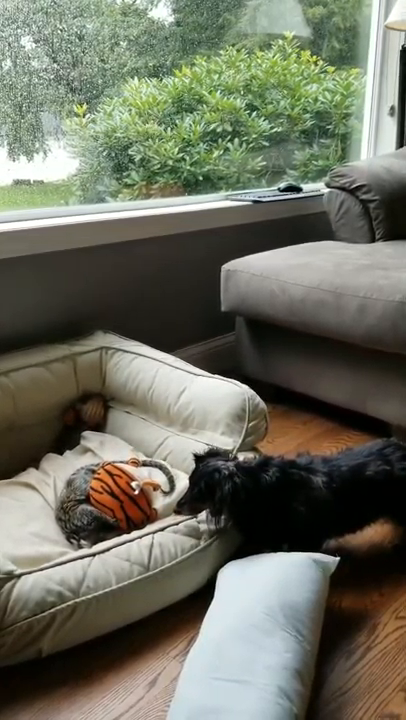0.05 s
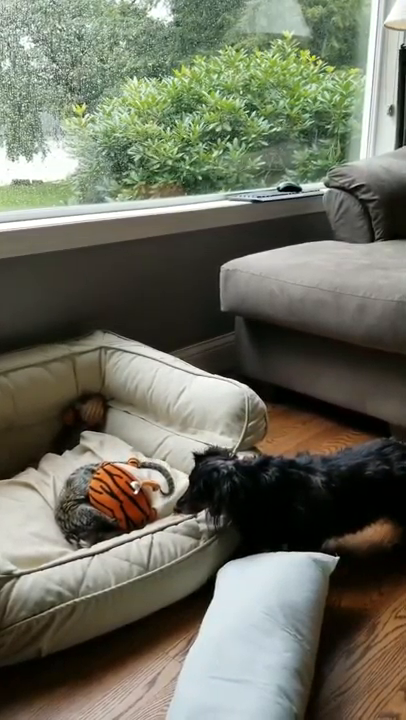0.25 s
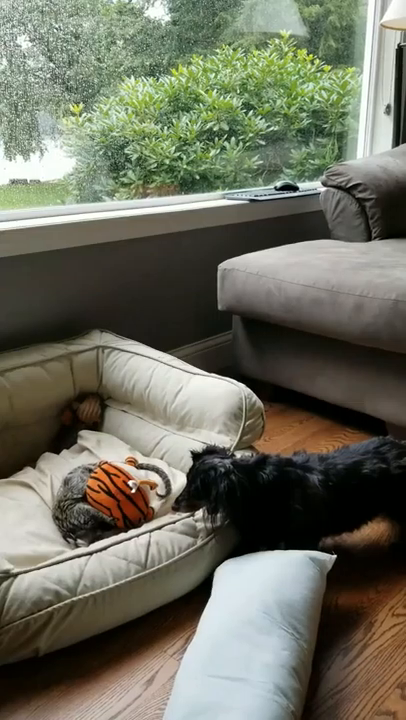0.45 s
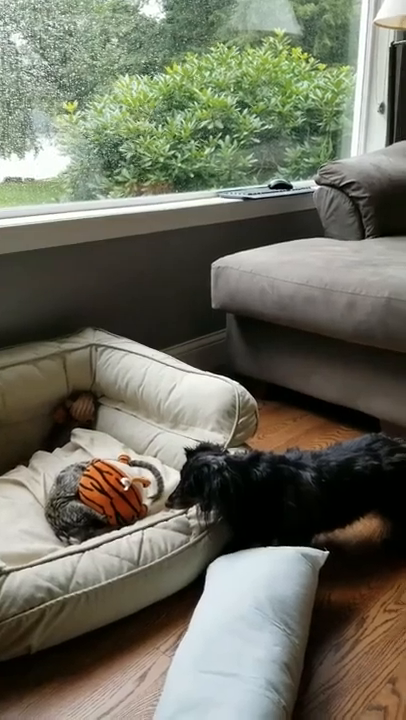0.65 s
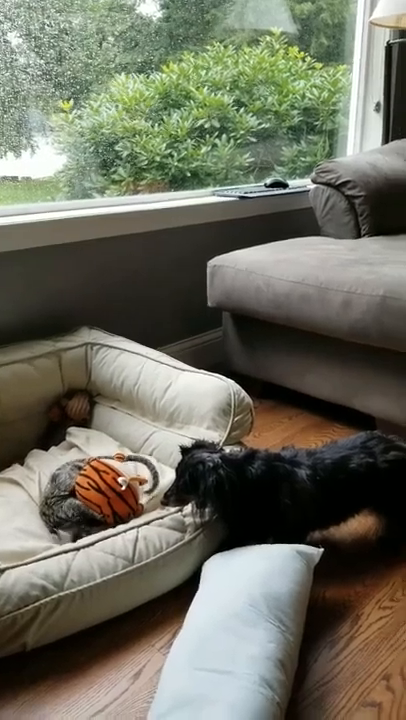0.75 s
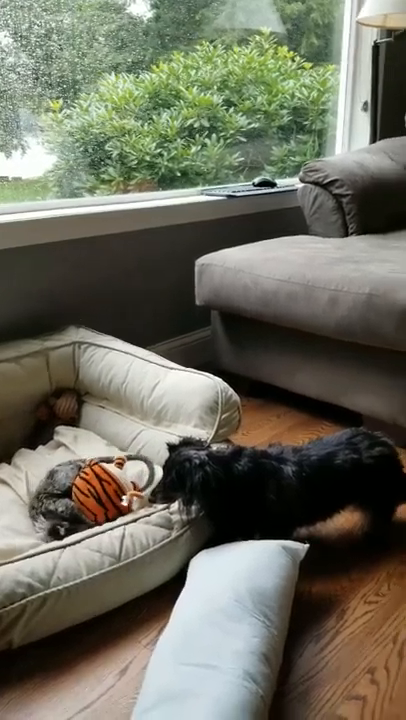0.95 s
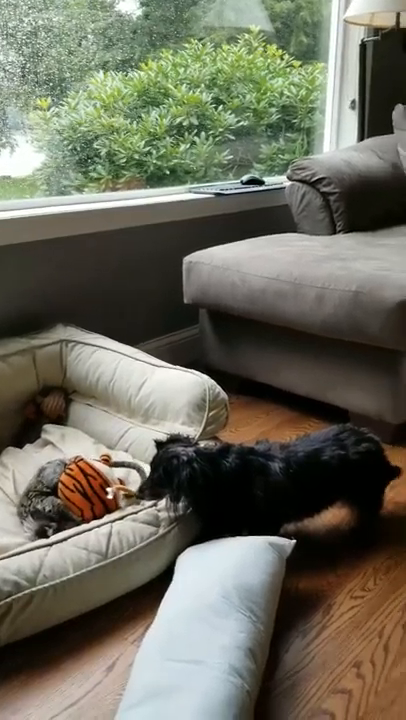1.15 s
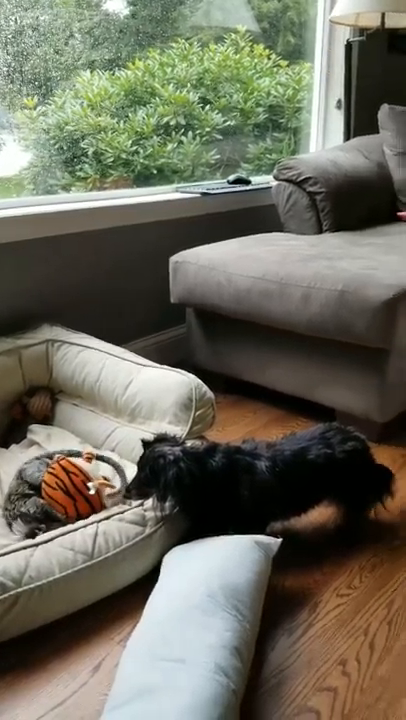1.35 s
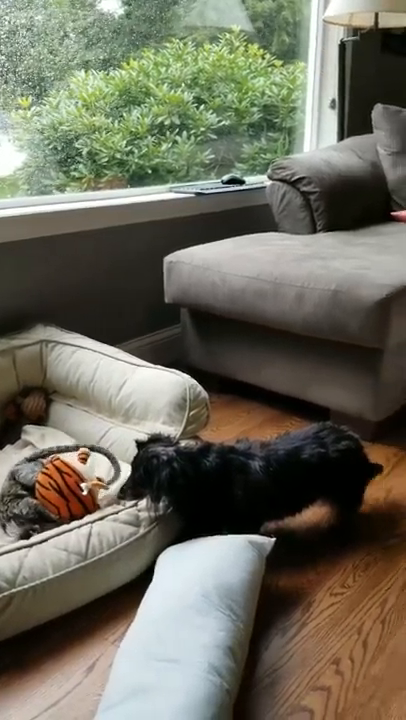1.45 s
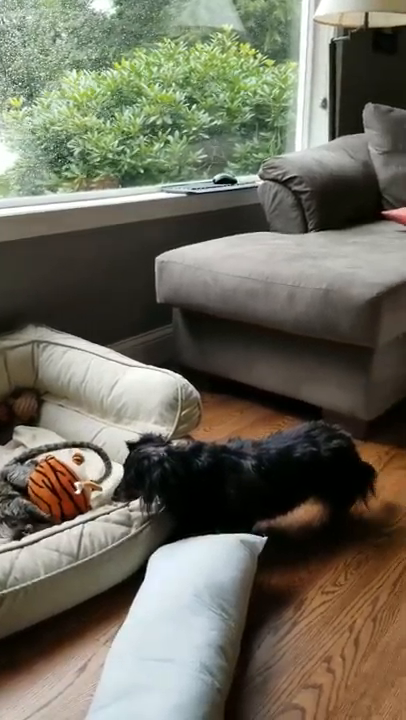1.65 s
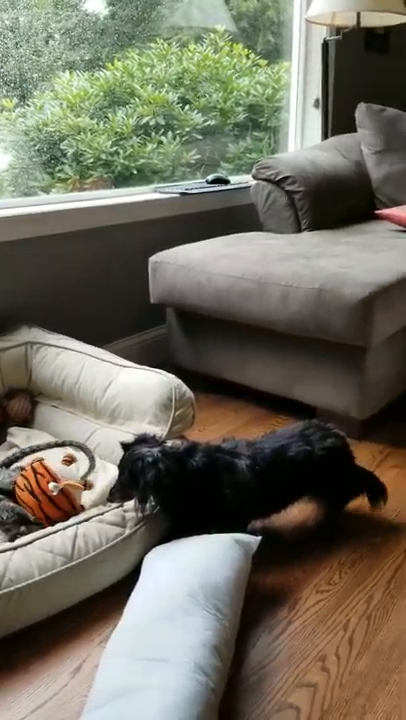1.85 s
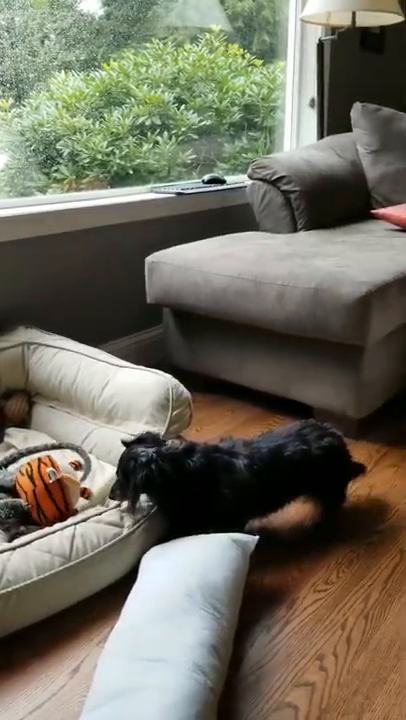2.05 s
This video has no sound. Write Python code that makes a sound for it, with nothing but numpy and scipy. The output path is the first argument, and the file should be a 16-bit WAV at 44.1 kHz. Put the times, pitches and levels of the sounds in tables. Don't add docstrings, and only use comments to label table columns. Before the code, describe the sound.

High squeaky chirps from a tiny monkey, then a harsh screech and a thin descending warble

```python
import sys
import numpy as np
from scipy import signal
from scipy.fft import rfft, irfft
from scipy.io import wavfile
from scipy.ndimage import uniform_filter1d

SR = 44100
rng = np.random.default_rng(int(sys.argv[2]) if len(sys.argv) > 2 else 0)


def convert_level_to_amplitude(level_db):
    exponent = np.asarray(level_db, float) / 20
    return 10 ** exponent


def unload_wav(signal):
    wavfile.write(
        sys.argv[1],
        SR,
        np.round(np.clip(np.atleast_2d(signal).T, -1, 1) * 32767).astype(np.int16),
    )


N = 92610

# time in seconds, pitch in Hz, level in dB.
CHIRP_PATHS = [
    [(.108, 9300, -94), (.122, 10700, -65), (.13, 10900, -59), (.145, 9500, -68), (.16, 8550, -70.5),
     (.172, 8500, -89)],
    [(.264, 6900, -88), (.272, 7400, -75.5), (.285, 9700, -59), (.292, 10900, -41.5), (.3, 10200, -80),
     (.307, 7800, -63.5), (.316, 5300, -55.5), (.326, 3200, -62.5), (.334, 2900, -77)],
    [(.52, 7600, -109), (.534, 9750, -55), (.55, 9980, -45.5), (.557, 9000, -66), (.565, 7100, -59.5),
     (.573, 5600, -56.5), (.58, 4300, -66), (.586, 4100, -105)],
]
CHIRP_HARMONICS = [
    [-0.5, -26],
    [2, 1.5, 1, -8],
    [1, -0.5, -4, -16],
]
# time in seconds, lowest pitch in Hz, upward pitch swing in Hz, level in dB.
TRILL_PATH = [(1.42, 9750, 400, -76), (1.465, 8900, 900, -75), (1.5, 8200, 898, -70),
              (1.575, 7980, 895, -72), (1.695, 7490, 1420, -73.5), (1.74, 7040, 1920, -75.5),
              (1.785, 6590, 2100, -72.5), (1.835, 6335, 730, -70.5), (1.868, 6480, 203, -111)]
TRILL_HARMONICS = [4, -5.5]
# frequency in Hz, gain in dB.
THROAT_COLOUR = [(6000, -15), (10000, 2), (12700, 10), (14200, -0.5), (16000, -14)]
# time in seconds, effort in dB, strain in dB, mouth opening as a pitch
# factor, mouth overtone level in dB.
SCREECH_COURSE = [(.695, -100, 16, 0.82, -31), (.72, -73, 16.5, 0.95, -20.5), (.755, -74, 26, 0.88, -5),
                  (.87, -62, 11.5, 0.98, 3), (.99, -65, 7, 1.09, 0.5), (1.085, -64.5, 18, 1.096, 6.5),
                  (1.19, -61, 6, 1.006, 0.5), (1.224, -61, 15.5, 1.07, 8), (1.245, -112, -39, 1.7, -7)]
# frequency in Hz, width
# in Hz, level in dB.
CHEST_RESONANCES = [(829, 280, -16), (1230, 720, -16.5), (1810, 170, -3.5), (2100, 550, 1), (2520, 520, -1),
                    (9300, 1300, -12.5)]
# frequency in Hz, width in Hz, level in dB.
MOUTH_RESONANCES = [(5300, 4900, -18), (6660, 3350, -12)]
# frequency in Hz, width in Hz, level in dB.
MOUTH_OVERTONES = [(11300, 1500, -24), (12060, 1540, -6), (13800, 4900, -22)]
# start in seconds, length in seconds, level in dB.
SNIFF_EVENTS = [
    (.0, .035, -111),
    (1.992, 0.06, -87.5),
]
# frequency in Hz, time to fall 60 dB in seconds.
ROOM_DECAY = [(1000, 0.17), (3000, 0.37), (7000, 0.3), (12000, 0.28), (16000, 0.12)]
# delay in seconds, level in dB.
EARLY_ECHOES = [(.006, -3.5), (.012, -9), (0.023, -17.5)]
# frequency in Hz, gain in dB.
LEFT_PORT_COLOUR = [(60, 9.5), (3500, -2), (5700, 7), (7300, 25.5), (9300, 3), (11800, 2), (15000, 26)]
# start in seconds, peak in dB, frequency in Hz, length in cycles.
AIR_THUMPS = [(.113, -43.5, 141.6, 2.8), (.152, -41.5, 102, 1), (0.22, -33.5, 157.4, 1.96),
              (.25, -39, 71, 2.3), (0.327, -33.5, 99, 1.23), (.352, -41, 83, 1.6), (0.41, -37, 111, 2.3),
              (.451, -36, 145, 1.3), (0.463, -36, 137, 1.17), (.48, -45, 82.6, 2), (0.536, -43.5, 123, 2.1),
              (0.33, -46, 417, 1.75), (0.473, -52, 544, 5.7), (0.253, -40, 220, 2.1)]
# time in seconds, level in dB.
GUST_SWELL = [(0, -82), (.1, -67), (.3, -47.5), (.55, -53.5), (.8, -58.5), (1.1, -60.5), (1.4, -64.5),
              (2.1, -82)]
# frequency in Hz, level in dB per Hz.
NOISE_SPECTRUM = [(15, -33.5), (25, -1), (102, -7), (436, -10.5), (768, -25), (1870, -29.5), (5070, -37.5),
                  (6460, -36), (15700, -38.5)]
# frequency in Hz, left-right correlation.
PORT_LIKENESS = [(60, -0.014), (180, 1), (550, 0.46), (1650, -0.25), (4970, 0.063), (15000, -0.065)]
# frequency in Hz, width in Hz, level in dB.
HUM_LINES = [(75.5, 18, -66.5), (119.8, 41, -63), (251.3, 39, -70.5), (425.5, 17, -74)]


def evened(x):
    return x / np.sqrt(np.mean(x ** 2) + 1e-20)


def read(points, hz):
    f, value = np.transpose(points)
    return np.interp(np.log(hz + 1), np.log(f + 1), value)


def curves(rows, size=1):
    t, rows = np.arange(N) / SR, np.array(rows, float)
    smooth = [uniform_filter1d(np.interp(t, rows[:, 0], column), size) for column in rows.T[1:]]
    return smooth + [(t >= rows[0, 0]) & (t < rows[-1, 0])]


def resonate(x, hz, width):
    turn = np.exp(2j * np.pi * np.cumsum(hz * np.ones(len(x))) / SR)
    r = np.exp(-np.pi * width / SR)
    ringing = signal.lfilter([(1 - r) ** 2], [1, -2 * r, r * r], x / turn + 1e-18)
    return 2 * (turn * ringing).real


def coloured(x, table, share=1):
    gain = convert_level_to_amplitude(share * read(table, np.fft.rfftfreq(2 * N, 1 / SR)))
    return irfft(rfft(x, 2 * N) * gain)[:N]


def whistle(hz, db, harmonics_db):
    hz = hz * (1 + 0.0015 * evened(uniform_filter1d(rng.standard_normal(N), size=60)))
    phase = 2 * np.pi * np.cumsum(hz) / SR
    soft_db = 0.2 * (db + 47)
    voice = 0
    for k, level_db in enumerate(harmonics_db, 1):
        if k > 1:
            level_db = level_db + soft_db + read(THROAT_COLOUR, k * hz)
        below_nyquist = np.clip((.47 * SR - k * hz) / 3000, 0, 1)
        voice = voice + convert_level_to_amplitude(level_db) * np.sin(k * phase) * below_nyquist
    return np.sqrt(2) * convert_level_to_amplitude(db) * voice


def chirps():
    out = np.zeros(N)
    for path, harmonics_db in zip(CHIRP_PATHS, CHIRP_HARMONICS):
        hz, db, on = curves(path, size=130)
        out += on * whistle(hz, db, harmonics_db)
    return out


def screech():
    slaps_per_s, slap_spread_db, breathy = 710, 1, 0.65
    effort_db, strain_db, mouth, over_db, on = curves(SCREECH_COURSE, size=200)
    slap_force = convert_level_to_amplitude(slap_spread_db * np.minimum(rng.exponential(1, N), 2))
    slaps = (rng.random(N) < slaps_per_s / SR) * slap_force
    gate = breathy + (1 - breathy) * evened(uniform_filter1d(slaps, size=22))

    def band(table, shift, passes):
        out = 0
        for hz, width, db in table:
            x = gate * rng.standard_normal(N)
            for _ in range(passes):
                x = resonate(x, hz * shift, width)
            out = out + convert_level_to_amplitude(db) * evened(x)
        return out

    overtones = band(MOUTH_OVERTONES, mouth ** .6, passes=1)
    high = band(MOUTH_RESONANCES, mouth, passes=2) + convert_level_to_amplitude(over_db) * overtones
    low = band(CHEST_RESONANCES, 0.95, passes=2)
    return on * convert_level_to_amplitude(effort_db) * (low + convert_level_to_amplitude(strain_db) * high)


def trill():
    swings_per_s, slowing_per_s2, thin_db = 28.5, -21.0, -11.0
    low, swing, db, on = curves(TRILL_PATH, size=400)
    t = np.arange(N) / SR - 1.465
    up = .5 - .5 * np.cos(2 * np.pi * (swings_per_s * t + .5 * slowing_per_s2 * t ** 2))
    return on * whistle(low + swing * up, db + thin_db * up, TRILL_HARMONICS)


def sniffs():
    t = np.arange(N) / SR
    hiss = evened(resonate(rng.standard_normal(N), 5000, 6900))
    since_tick = t - .4715
    out = convert_level_to_amplitude(-56) * np.exp(-(since_tick / .00005) ** 2) * np.cos(2 * np.pi * 10000 * since_tick)
    for start, length, db in SNIFF_EVENTS:
        out = out + hiss * convert_level_to_amplitude(db) * np.sin(np.pi * np.clip((t - start) / length, 0, 1))
    return out


def room(x):
    tail_db, build_s = -1, .012
    taps = np.zeros((2, SR // 2))
    at = np.arange(60, SR // 2 - 10, 10) + rng.integers(0, 10, (2, (SR // 2 - 61) // 10))
    np.put_along_axis(taps, at, rng.choice([-1., 1.], at.shape), 1)
    hz, t, z = signal.stft(taps, SR, nperseg=128)
    decay = convert_level_to_amplitude(-60 * t / read(ROOM_DECAY, hz)[:, None])
    tail = signal.istft(z * decay, SR, nperseg=128)[1]
    tail = tail * np.minimum(np.arange(tail.shape[1]) / SR / build_s, 1)
    tail = convert_level_to_amplitude(tail_db) * tail / np.linalg.norm(tail[0])
    for s, db in EARLY_ECHOES:
        tail[[0, 1], [round(s * SR), round(s * 1.17 * SR)]] += convert_level_to_amplitude(db)
    tail[[0, 1], [0, 4]] += 1
    return signal.fftconvolve(x[None], tail, axes=1)[:, :N]


def air():
    t = np.arange(N) / SR
    lumps = convert_level_to_amplitude(4.2 * evened(uniform_filter1d(rng.standard_normal(N), size=900)))
    rumble = resonate(rng.standard_normal(N), 55, 190)
    out = convert_level_to_amplitude(curves(GUST_SWELL)[0]) * evened(lumps * rumble)
    for start, db, hz, cycles in AIR_THUMPS:
        progress = np.clip((t - start) * hz / cycles, 0, 1)
        swell = np.sin(np.pi * progress ** 0.81)
        out = out - convert_level_to_amplitude(db) * swell * np.sin(2 * np.pi * hz * (t - start))
    return out * convert_level_to_amplitude(np.array([[-33.5], [0]]))


def house():
    frames, hz = N // 512 + 5, np.fft.rfftfreq(2048, 1 / SR)
    a, b, c, d = rng.standard_normal((frames, 1025, 4)).T
    same = np.clip(read(PORT_LIKENESS, hz), -1, 1)[:, None]
    left = a + 1j * b
    right = same * left + np.sqrt(1 - same ** 2) * (c + 1j * d)
    z = np.array([left, right]) * convert_level_to_amplitude(read(NOISE_SPECTRUM, hz))[:, None]
    bed = convert_level_to_amplitude(-63.5) * evened(signal.istft(z, nperseg=2048, noverlap=1536)[1][:, :N])
    hum = sum(convert_level_to_amplitude(db) * evened(resonate(rng.standard_normal(N), f, w)) for f, w, db in HUM_LINES)
    return np.array([coloured(bed[0], LEFT_PORT_COLOUR, share=0.13), bed[1]]) + hum


def scene():
    heard = room(chirps() + trill() + screech() + sniffs())
    monkey = convert_level_to_amplitude(-4.5) * np.array([coloured(heard[0], LEFT_PORT_COLOUR), heard[1]])
    return monkey + house() + air()


def band_limit(x):
    return signal.sosfilt(signal.butter(12, 15890, fs=SR, output="sos"), x)


def record(dry):
    hush_db, hush_from_db, edge_hz = -5, -56, 15850
    hz, t, z = signal.stft(dry, SR, nperseg=512)
    call_power = (abs(z[:, hz > 5000]) ** 2).sum((0, 1))
    loud_db = 10 * np.log10(uniform_filter1d(call_power, size=5) + 1e-12)
    hush = hush_db * np.clip((loud_db - hush_from_db) / 10, 0, 1)
    inside = ((hz > 2750) & (hz < 4300))[:, None]
    x = signal.istft(z * convert_level_to_amplitude(inside * hush), SR, nperseg=512)[1][:, :N]
    lowpass = signal.firwin(511, edge_hz, window=("kaiser", 9), fs=SR)
    x = signal.oaconvolve(x, lowpass[None], "same", axes=1)
    return band_limit(x)


dry = scene()
out = record(dry)
unload_wav(out)
```